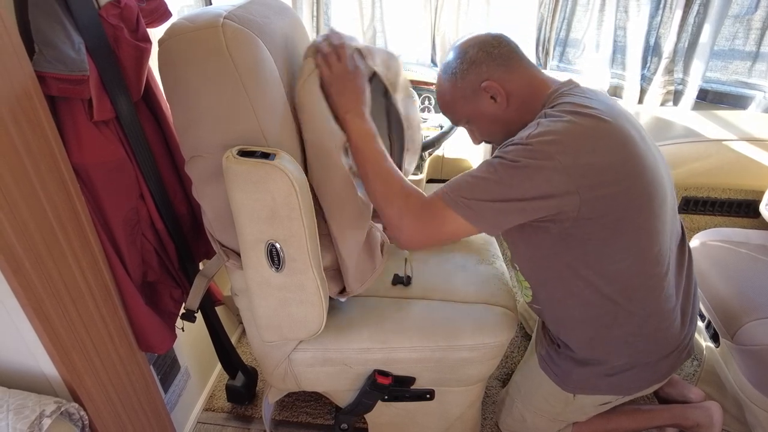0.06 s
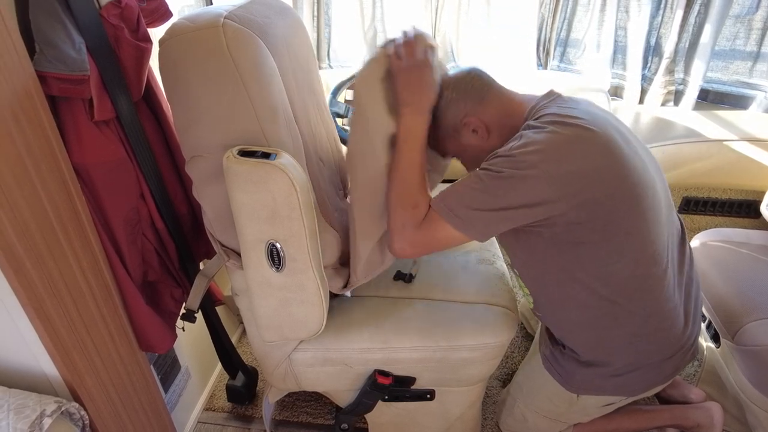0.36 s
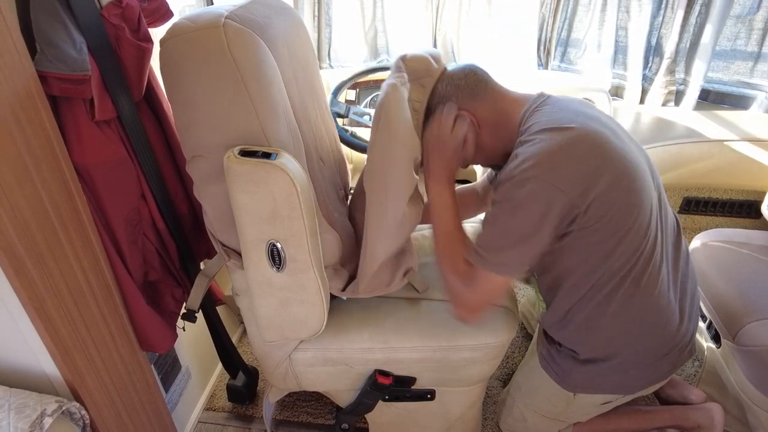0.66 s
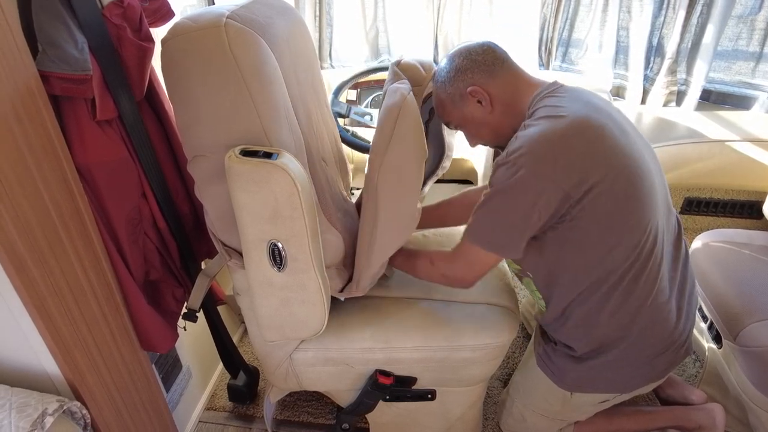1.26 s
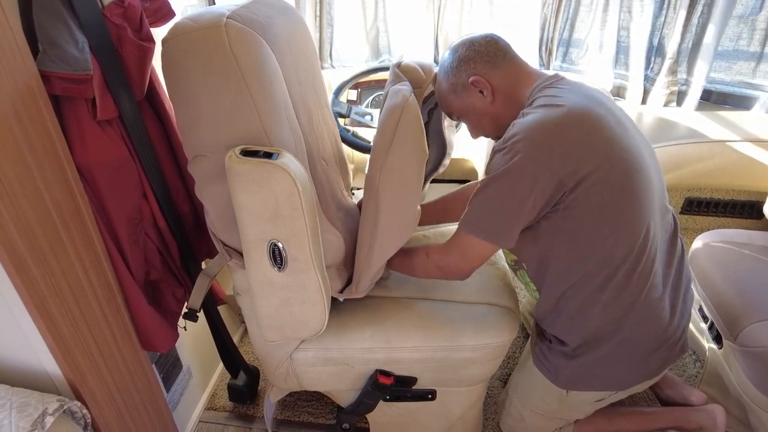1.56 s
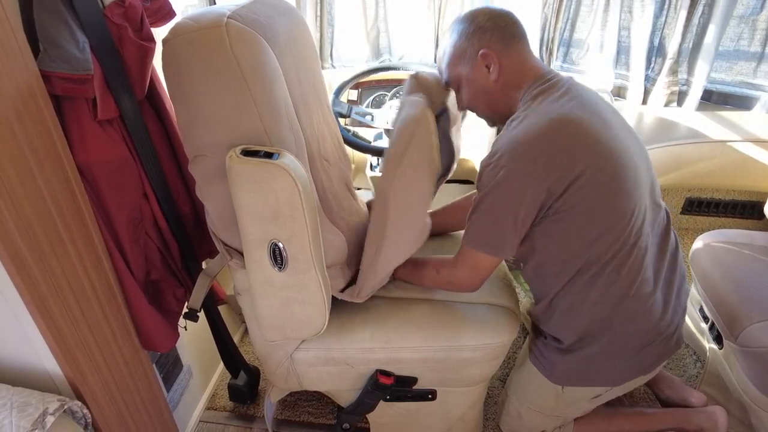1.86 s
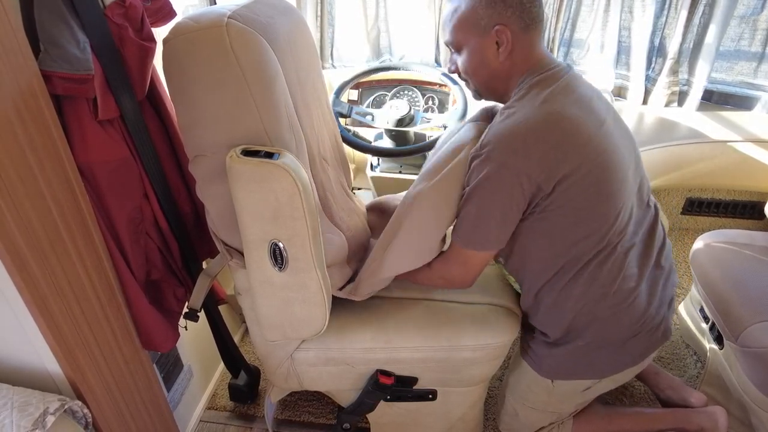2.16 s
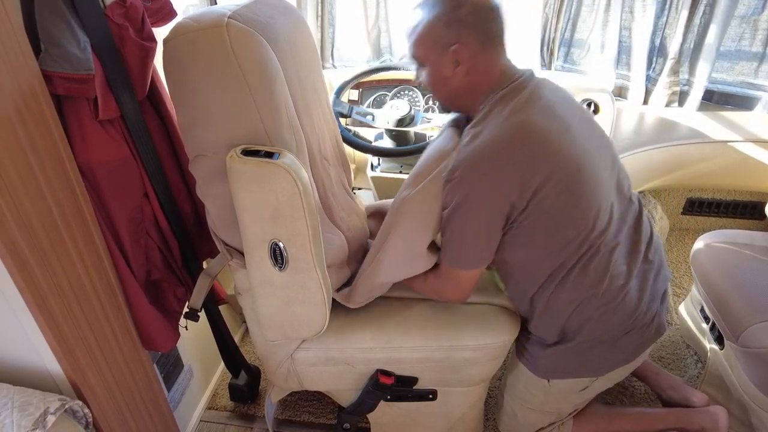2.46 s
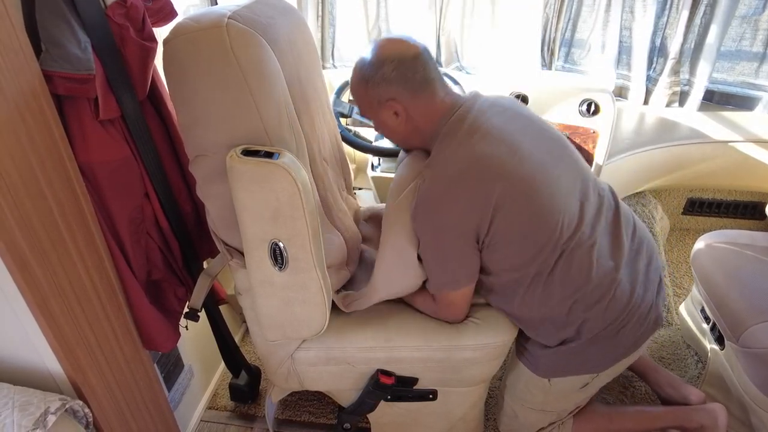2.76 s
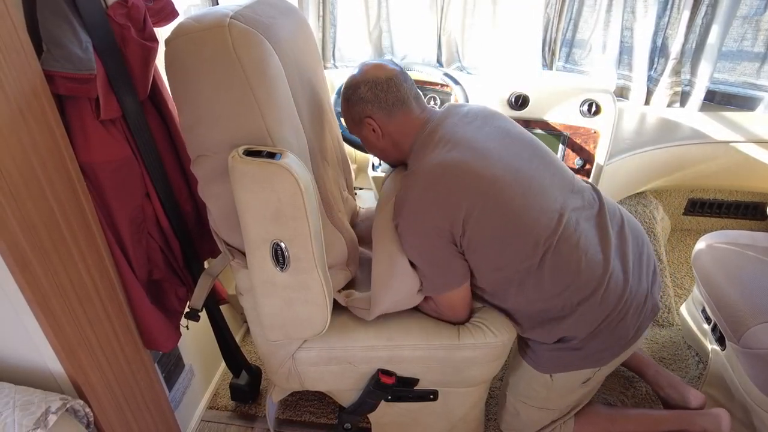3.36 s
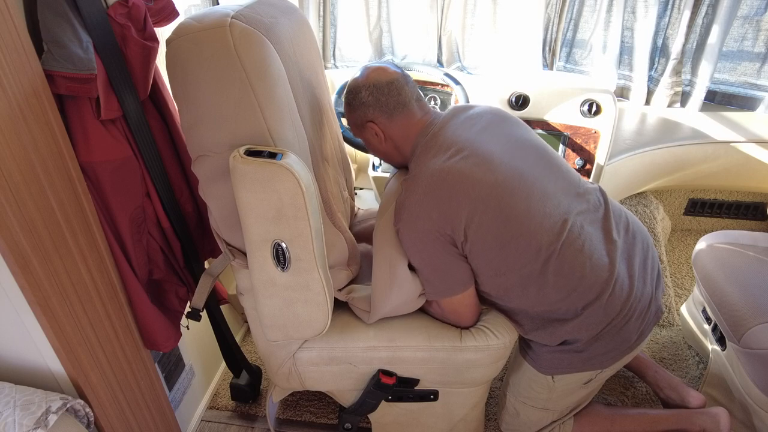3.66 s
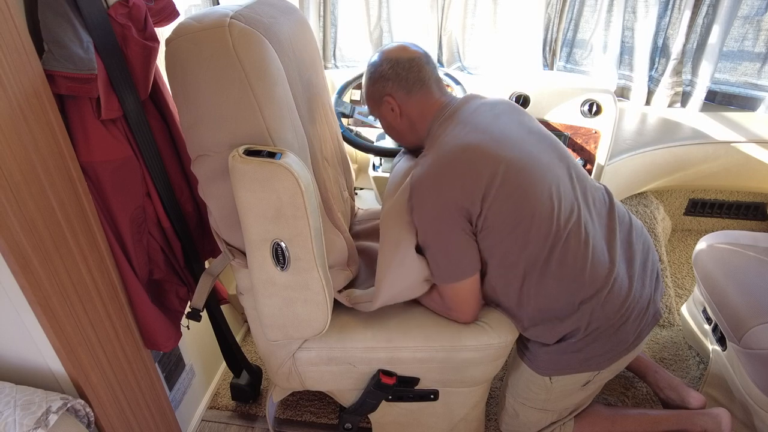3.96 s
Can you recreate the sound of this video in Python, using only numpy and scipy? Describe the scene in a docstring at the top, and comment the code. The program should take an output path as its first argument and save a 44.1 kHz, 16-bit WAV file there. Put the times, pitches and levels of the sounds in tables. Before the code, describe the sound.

Cloth rustling and rubbing as a cover is pulled and tucked onto a padded seat.

```python
"""Fitting a cloth seat cover

Inside a parked vehicle, one microphone close to a padded vinyl seat back. A cover is pulled down and
tucked into the crease: each stroke rubs dully on the upholstery and hisses along the weave. Folds snap
taut, seams tick, the vinyl squeaks and the cushion thumps. Moving air rumbles on the microphone."""
import sys
import numpy as np
from scipy import signal
from scipy.fft import rfft, irfft, next_fast_len
from scipy.io import wavfile
from scipy.ndimage import map_coordinates

SR = 44100
rng = np.random.default_rng(int(sys.argv[2]) if len(sys.argv) > 2 else 0)


def wav_record(signal):
    """Record a signal, one row per channel, as 16-bit PCM in the file named by sys.argv[1]."""
    frames = np.transpose(np.atleast_2d(signal))
    bounded = np.clip(frames, -1, 1)
    # unit amplitude maps onto the largest positive 16-bit level
    quanta = np.round(bounded * 32767).astype(np.int16)
    wavfile.write(sys.argv[1], SR, quanta)


N = 176400  # 4 s

# Hand strokes, first down the seat back, then into the crease:
# peak t/s, rise/s, fall/s, rub level/dB, hiss level/dB, weave band f/Hz, hiss tilt/(dB per octave)
PULL_STROKES = [ (.035, 0.022, 0.014, -45, -59, 2230, -2), (.18, 0.084, 0.081, -50.5, -65.5, 5730, -1),
                (.36, 0.032, 0.033, -54, -64, 5700, -3), (.419, 0.0022, 0.0063, -48, -61, 7200, -2),
                (.458, 0.026, 0.015, -45, -59.5, 5200, -3.5), (.53, 0.052, 0.022, -49.5, -64, 5640, -0.5),
                (.72, 0.041, 0.02, -79, -65.5, 5360, 7.5), (.912, 0.002, 0.04, -47, -54, 6100, 2),
                (1.017, 0.032, 0.033, -42, -46.7, 4020, 4.5), (1.06, .009, 0.046, -43.5, -53.5, 2310, -3),
                (1.165, 0.039, 0.024, -44.5, -47.5, 4140, 5.5), (1.33, 0.094, 0.087, -48, -60.5, 4580, 1.5),
                (1.475, 0.028, 0.037, -44, -57.5, 4640, -1), (1.572, 0.026, 0.022, -52.5, -56, 5040, -1),
                (1.72, 0.061, 0.037, -43.5, -53.5, 4180, 0.5), (1.777, 0.017, 0.0063, -39.5, -54, 3000, 12)]
TUCK_STROKES = [ (1.87, 0.059, 0.084, -44.5, -58.5, 6140, -2), (1.995, 0.036, 0.022, -47.5, -55, 5540, 0.5),
                (2.106, 0.0036, 0.055, -44.5, -57, 4800, -2), (2.158, 0.014, .016, -56, -52.5, 5170, 10.5),
                (2.245, 0.026, 0.026, -45, -50.5, 5340, 3), (2.305, 0.028, 0.029, -46, -70, 2500, -6),
                (2.445, 0.056, 0.06, -44, -60.5, 5100, -1), (2.55, 0.026, 0.033, -46, -62.5, 5400, 6),
                (2.655, 0.029, 0.052, -45, -51.5, 4770, 4), (2.74, .04, 0.045, -46, -61.5, 5230, 3.5),
                (2.94, 0.087, 0.079, -46, -55, 5800, -5), (3.0, 0.026, 0.032, -61, -57, 5300, 3),
                (3.17, 0.052, 0.039, -45.5, -57, 2960, -0.5), (3.3, 0.071, 0.032, -49, -62.5, 5100, 2),
                (3.46, 0.08, 0.14, -43, -57, 5000, 0), (3.69, 0.049, 0.013, -47, -57, 6200, -3),
                (3.785, 0.054, 0.061, -43, -45.5, 5800, -1.7), (3.872, 0.043, 0.021, -45, -46, 5400, -2),
                (4.0, 0.013, 0.044, -42.5, -44, 5100, -1.5)]
# Dull rub and bright hiss of each kind of stroke: f/Hz, relative level/dB
PULL_RUB_SPECTRUM = [(60, 12), (150, -3), (280, -2.5), (520, -1.5), (850, 2.5), (1220, 0.5), (1600, -6),
                     (1950, -6), (2500, -21.5), (3600, -22), (8000, -47)]
PULL_HISS_SPECTRUM = [(500, -39), (1500, -14), (2300, 4.5), (3200, -2.5), (4000, -1), (5000, -3.5),
                      (6000, -6.5), (7300, -5.5), (9200, -12.5), (11000, -12.5), (12700, -15), (13900, -16),
                      (15500, -15)]
TUCK_RUB_SPECTRUM = [(60, -20), (150, 2.5), (280, -1), (450, -3.5), (750, -1.5), (1200, -6.5),
                     (1700, -12.5), (2500, -15.5), (3600, -27), (8000, -37)]
TUCK_HISS_SPECTRUM = [(500, -40), (1500, -2.5), (2600, 0.5), (3600, -1), (5300, -4), (7200, -4),
                      (9000, -6.5), (12000, -14), (15500, -14)]
# Weave sliding fast over smooth vinyl: t/s, half-width/s, level/dB, centre f/Hz
FAST_SLIDES = [(.4185, .002, -60, 14500), (1.15, .02, -57, 15000), (1.325, 0.048, -74, 12400),
               (1.46, .03, -70, 12700), (1.57, 0.023, -70, 12500), (1.725, .035, -61, 15200),
               (2.156, .006, -57, 13500)]
# Folds snapping taut: t/s, peak level/dB, f/Hz, half-width/cycles
FOLD_SNAPS = [(.046, -38.5, 1010, 1.9), (.394, -39.5, 139, 0.5), (.4205, -41, 610, 0.63),
              (.439, -47, 298, 0.27), (.449, -32.5, 294, 0.2), (.582, -40, 108, 0.45),
              (.739, -43.5, 211, 0.37), (.7425, -45, 650, 0.4), (.9084, -28.5, 266, 0.25),
              (.9088, -39, 650, 0.47), (.962, -38, 266, 0.51), (.984, -24.5, 800, 0.17),
              (1.0615, -35, 1220, 3), (1.347, -27.5, 1100, 0.59), (1.7205, -27, 597, 0.3),
              (1.7778, -20, 780, 0.27), (1.7788, -30, 1460, 1.8), (1.876, -40, 228, 0.47),
              (2.107, -36, 1516, 0.74), (2.2443, -28, 1290, 1.2), (2.2455, -23, 388, 0.31),
              (2.419, -31, 305, 0.15), (2.549, -31.5, 980, 0.36), (3.147, -33, 222, 0.36),
              (3.265, -40, 270, 0.4), (3.298, -32.5, 230, 0.56), (3.301, -39.5, 560, 1.8),
              (3.8553, -23, 596, 0.45), (3.8585, -21, 270, 0.4), (3.864, -29, 400, 0.24)]
# Cushion giving under the hands: t/s, peak level/dB, f/Hz, half-width/cycles, scuff level/dB
CUSHION_THUMPS = [(0.359, -34.5, 33.6, 0.77, -46), (.448, -37, 119, 0.86, -44),
                  (0.92, -31.5, 41.5, 0.62, -38), (1.796, -32, 91, 1, -38.5),
                  (2.003, -33.5, 102, 0.26, -39), (2.158, -21.5, 26.4, 0.23, -41),
                  (2.192, -27.5, 46, 0.75, -45), (2.246, -29, 110, 0.41, -52),
                  (2.538, -26.5, 41.5, 0.37, -40), (2.654, -14.5, 31.8, 0.4, -35),
                  (2.807, -24.5, 25.8, 0.52, -47), (3.159, -26, 37.3, 1, -41), (3.323, -28, 58, 0.57, -41),
                  (3.688, -37, 60, 0.26, -41), (3.862, -35, 140, 0.68, -27.5)]
# Cloth scuffing over the cushion: f/Hz, relative level/dB
SCUFF_SPECTRUM = [(20, -17), (70, 5.5), (140, -3.5), (300, -14.5), (600, -33), (1500, -45), (5000, -78)]
# Stick-slip on the vinyl: t/s, peak level/dB, f/Hz, half-width/s, glide/(octaves per s)
VINYL_SQUEAKS = [(0.089, -50, 4570, 0.00073, 8), (.418, -50, 7280, 0.00073, -6),
                 (0.639, -38, 262, 0.0048, 19), (0.665, -53, 431, 0.01, 22), (1.718, -35, 3950, 0.0018, -6),
                 (1.798, -57, 3000, 0.028, 0.5), (1.822, -43, 2950, 0.0039, -1),
                 (2.752, -42.5, 696, 0.0064, 4)]
# Seams flicking over the seat: t/s, relative level/dB
SEAM_TICKS = [(0.087, -47), (0.096, -46.5), (0.419, -47), (0.983, -43), (1.776, -40), (2.158, -45),
              (2.549, -48)]
# Rise and fall of the air on the microphone: t/s, relative level/dB
AIR_LEVELS = [(0.0, -43), (0.38, -40), (0.76, -45.5), (0.9, -36), (1.66, -46.5), (1.8, -36.5),
              (2.07, -40.5), (2.19, -26.5), (2.34, -42), (2.67, -31), (2.95, -33), (4.0, -31)]
# Air rumble and the cabin's own hush: f/Hz, relative level/dB
RUMBLE_SPECTRUM = [(5, 7), (14, 6), (25, 3.5), (50, -14), (80, -15), (130, -22.5), (250, -37), (600, -67.5)]
HUSH_SPECTRUM = [(30, 12), (150, -1), (400, -8), (700, -6), (1200, -8), (1800, -17), (3500, -24.5),
                 (8000, -37.5), (15500, -36)]

RUB_CATCHES_PER_S, RUB_CATCH_SHARE, RUB_ROUGH_DB = 420, 0.13, 1.13
HISS_CATCHES_PER_S, HISS_CATCH_SHARE, HISS_ROUGH_DB = 1800, 0.2, 0.93
WEAVE_BOOST_DB, WEAVE_WIDTH_OCT = 6.5, 0.23  # the weave's band over the broad hiss
STROKE_SHAPE = 1.36  # 2 is a bell; less gives a sharper peak and longer tails


def cloth_strokes(rows, rub_spectrum, hiss_spectrum):
    """Cloth drawn over upholstery: a dull rub and a hiss swell and fade with the speed of each stroke."""
    t, rub_power, hiss = clock(), np.zeros(N), np.zeros(N)
    for peak, rise, fall, rub_db, hiss_db, centre_hz, tilt_db in rows:
        near = abs(t - peak) < .5
        since = t[near] - peak
        ramp_s = np.where(since < 0, rise, fall)
        speed = np.exp(-.5 * abs(since / ramp_s) ** STROKE_SHAPE)
        rub_power[near] += (amp(rub_db) * speed) ** 2
        sliding = friction(HISS_CATCHES_PER_S, HISS_CATCH_SHARE)[near]
        hiss[near] += amp(hiss_db) * speed * weave_hiss(sliding, hiss_spectrum, centre_hz, tilt_db)
    rub = np.sqrt(rub_power) * coloured(friction(RUB_CATCHES_PER_S, RUB_CATCH_SHARE), rub_spectrum)
    rub *= amp(RUB_ROUGH_DB * wobble(60))
    hiss = shifting_contact(hiss) * amp(HISS_ROUGH_DB * wobble(70))
    return rub + hiss


def friction(catches_per_s, share):
    """Smooth sliding noise mixed with separate catches of fibres, which carry a share of the power."""
    catches = (rng.random(N) < catches_per_s / SR) * rng.standard_normal(N)
    return np.sqrt(1 - share) * rng.standard_normal(N) + np.sqrt(share) * unit(catches)


def weave_hiss(sliding, spectrum, centre_hz, tilt_db):
    """The weave colours sliding noise into a broad, tilted hiss with one raised band, at rms 1."""
    def gain(hz):
        octaves = np.log2((hz + 1) / centre_hz)
        band_db = WEAVE_BOOST_DB * bell(octaves, WEAVE_WIDTH_OCT)
        return amp(along(spectrum, hz) + tilt_db * octaves + band_db)
    return unit(filtered(sliding, gain))


def shifting_contact(hiss, swing_db=2.03, patch_hz=624, patch_s=.09):
    """As the contact moves, bands of the hiss swell and fade at random."""
    hz, t, bands = signal.stft(hiss, SR, nperseg=512)
    grid = np.meshgrid(hz / patch_hz, t / patch_s, indexing="ij")
    patches = map_coordinates(rng.standard_normal((128, 256)), grid, mode="mirror")
    return signal.istft(bands * amp(swing_db * patches), nperseg=512)[1][:N]


def weave_sizzle(width_hz=1300):
    """The weave sings in a thin, high band where it slides fast over smooth vinyl."""
    out = np.zeros(N)
    for at, width_s, db, centre_hz in FAST_SLIDES:
        sliding = friction(HISS_CATCHES_PER_S, HISS_CATCH_SHARE)
        band = filtered(sliding, lambda hz: bell(hz - centre_hz, width_hz))
        out += amp(db) * bell(clock() - at, width_s) * unit(band)
    return out


def fold_snaps():
    """Each fold pulls taut in one short, damped swing."""
    return sum(damped_swing(*snap) for snap in FOLD_SNAPS)


def cushion_thumps():
    """The foam gives in one low swing while the cloth scuffs over it."""
    foam, scuff_envelope = np.zeros(N), np.zeros(N)
    for at, db, hz, cycles, scuff_db in CUSHION_THUMPS:
        foam += damped_swing(at, db, hz, cycles)
        scuff_envelope += amp(scuff_db) * bell(clock() - at, cycles / hz)
    return foam + scuff_envelope * coloured(rng.standard_normal(N), SCUFF_SPECTRUM)


def damped_swing(at, db, hz, cycles):
    """Heavily damped cloth or foam swings briefly: a cosine under a bell."""
    turns = (clock() - at) * hz
    near = abs(turns) < 5 * cycles
    return near * amp(db) * bell(turns, cycles) * np.cos(2 * np.pi * turns)


def vinyl_squeaks(jitter_hz=24, pure_above_hz=1100):
    """The vinyl sticks and slips at an unsteady, gliding pitch; high squeaks are nearly pure."""
    out, t = np.zeros(N), clock()
    for at, db, hz, width_s, glide in VINYL_SQUEAKS:
        pitch = hz * 2 ** np.clip(glide * (t - at), -1, 1) + jitter_hz * wobble(600)
        phase = 2 * np.pi * np.cumsum(pitch) / SR
        overtone = amp(-8.5) * np.exp(-hz / pure_above_hz) * np.sin(2 * phase)
        out += amp(db) * bell(t - at, width_s) * (np.sin(phase) + overtone)
    return out


def seam_ticks(width_s=0.002):
    """Seams flick over the seat with a brief bright crack."""
    envelope = sum(amp(db) * bell(clock() - at, width_s) for at, db in SEAM_TICKS)
    return envelope * coloured(rng.standard_normal(N), PULL_HISS_SPECTRUM) / np.pi


def air_on_microphone(trim_db=-0.5, swing_db=1.1):
    """Stirred air buffets the microphone with an uneven rumble."""
    level_db = np.interp(clock(), *np.transpose(AIR_LEVELS)) + trim_db + swing_db * wobble(10)
    return amp(level_db) * coloured(rng.standard_normal(N), RUMBLE_SPECTRUM)


def in_cabin(direct, t60_s=0.1, tail_db=-15):
    """The direct sound plus the short answer of a small, padded space."""
    t = np.arange(SR // 4) / SR
    tail = rng.standard_normal(len(t)) * amp(-60 * t / t60_s) * (t > .003)  # first return at 3 ms
    return direct + amp(tail_db) * signal.fftconvolve(direct, tail / np.linalg.norm(tail))[:N]


def cabin_hush(level_db=-50):
    """Steady room tone of the parked vehicle."""
    return amp(level_db) * coloured(rng.standard_normal(N), HUSH_SPECTRUM)


def amp(db):
    """Decibels to gain."""
    return 10 ** (np.asarray(db) / 20)


def unit(x):
    """Scale to rms 1."""
    return x / np.sqrt(np.mean(x ** 2) + 1e-20)


def clock():
    """The time of each sample in seconds."""
    return np.arange(N) / SR


def bell(x, width):
    """A smooth swell around x = 0; width is the half-width at 61 % of the peak."""
    return np.exp(-.5 * (x / width) ** 2)


def wobble(knots_per_s):
    """A smooth random curve."""
    knots = rng.standard_normal(int(N * knots_per_s / SR) + 4)
    return map_coordinates(knots, [clock() * knots_per_s])


def along(spectrum, hz):
    """A spectrum's level in dB at hz, read on a log frequency axis."""
    knots_hz, db = np.transpose(spectrum)
    return np.interp(np.log(hz + 1), np.log(knots_hz + 1), db)


def filtered(x, gain):
    """x times a gain that depends on frequency."""
    size = next_fast_len(len(x) + 8192)
    return irfft(rfft(x, size) * gain(np.fft.rfftfreq(size, 1 / SR)), size)[:len(x)]


def coloured(x, spectrum):
    """x shaped by a spectrum, at rms 1."""
    return unit(filtered(x, lambda hz: amp(along(spectrum, hz))))


def scene():
    """Cloth, seat and air as they reach the microphone, in mono."""
    pulls = cloth_strokes(PULL_STROKES, PULL_RUB_SPECTRUM, PULL_HISS_SPECTRUM)
    tucks = cloth_strokes(TUCK_STROKES, TUCK_RUB_SPECTRUM, TUCK_HISS_SPECTRUM)
    cloth = pulls + tucks + weave_sizzle()
    small_sounds = in_cabin(fold_snaps() + vinyl_squeaks() + seam_ticks())
    return (cloth + small_sounds + cushion_thumps() + air_on_microphone() + cabin_hush())[None]


def record(dry):
    """The microphone's channel keeps nothing above its band limit."""
    top_hz = 15800
    return np.array([filtered(channel, lambda hz: hz < top_hz) for channel in dry])


dry = scene()
out = record(dry)
wav_record(out)
```